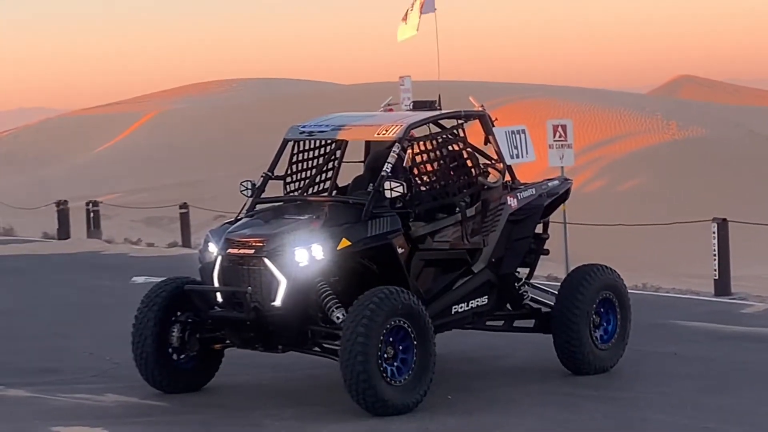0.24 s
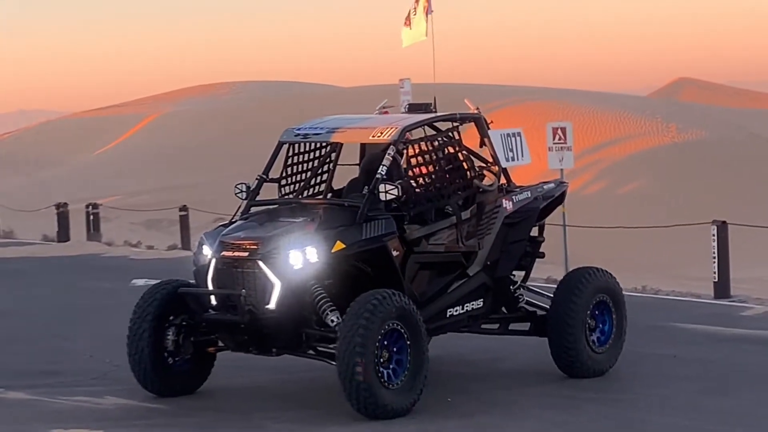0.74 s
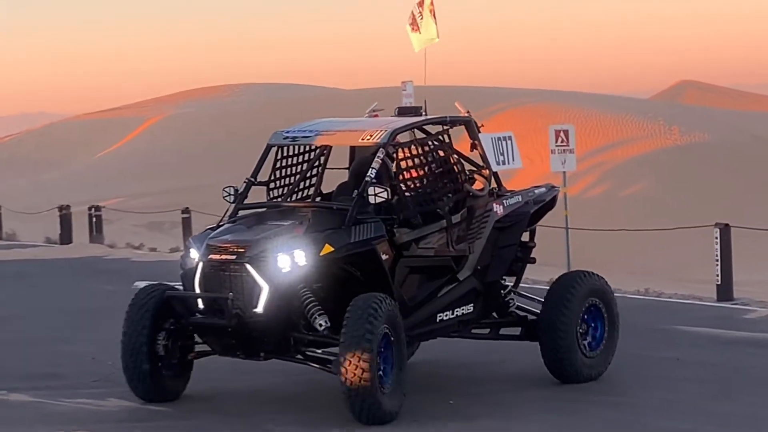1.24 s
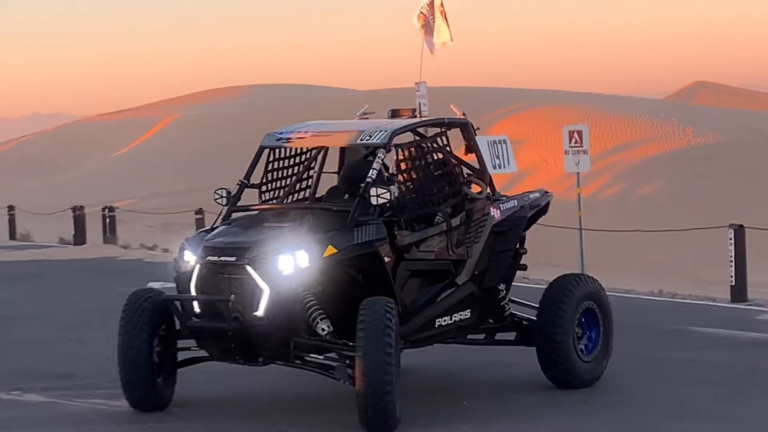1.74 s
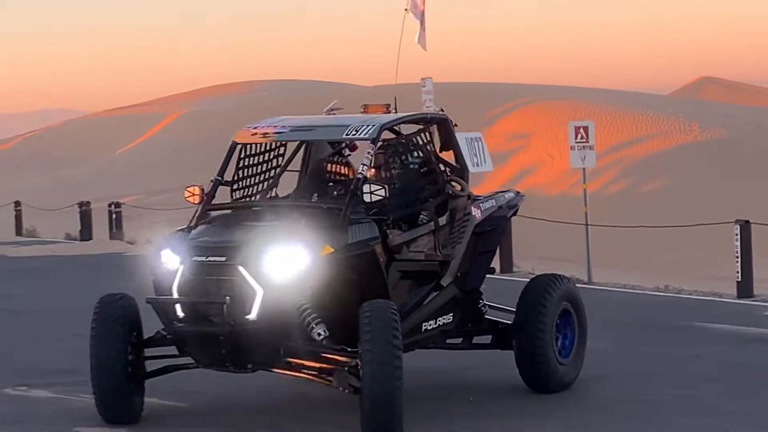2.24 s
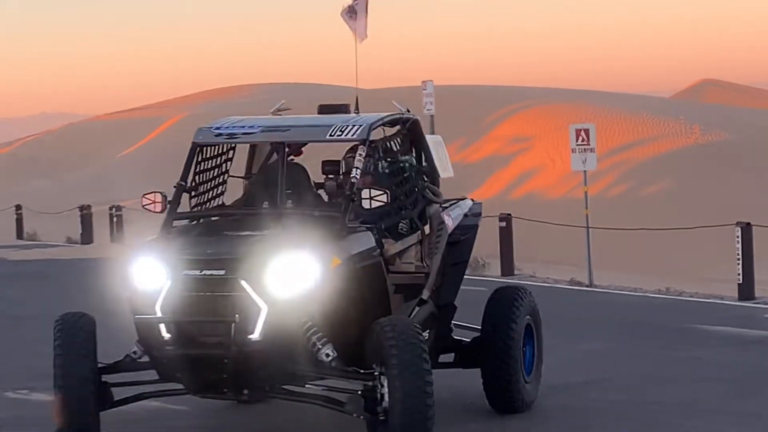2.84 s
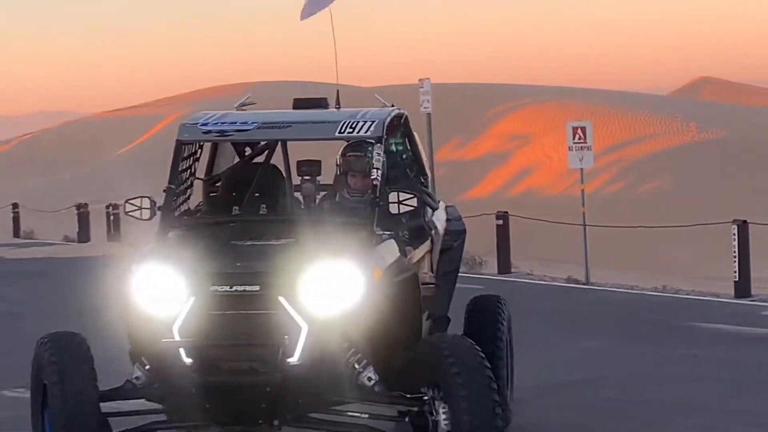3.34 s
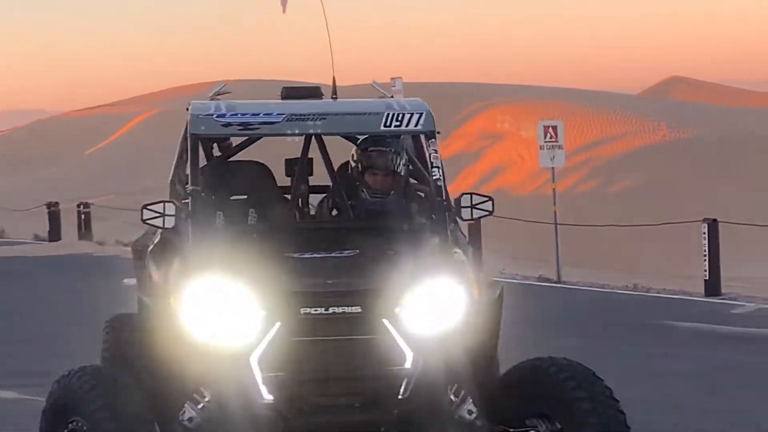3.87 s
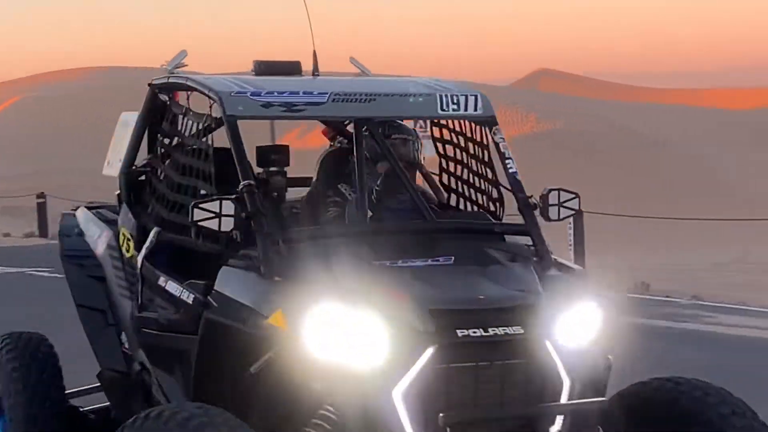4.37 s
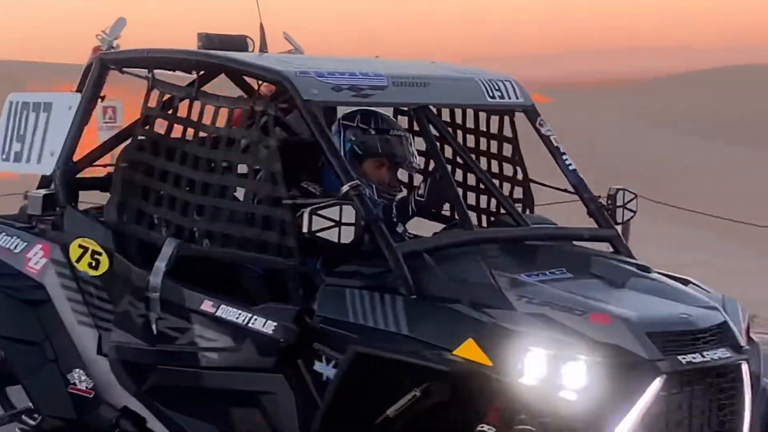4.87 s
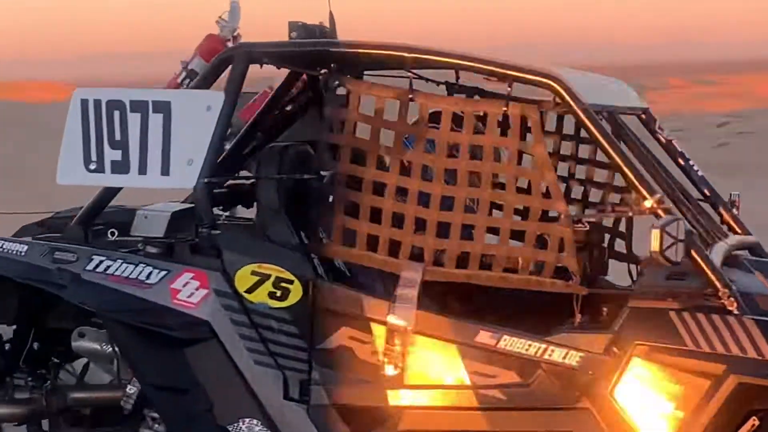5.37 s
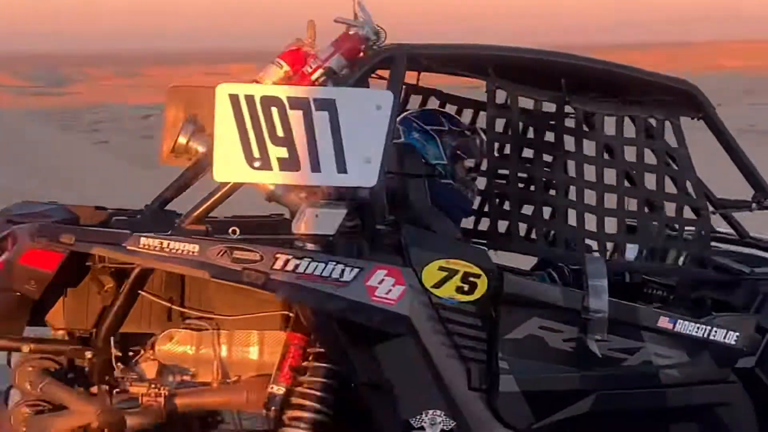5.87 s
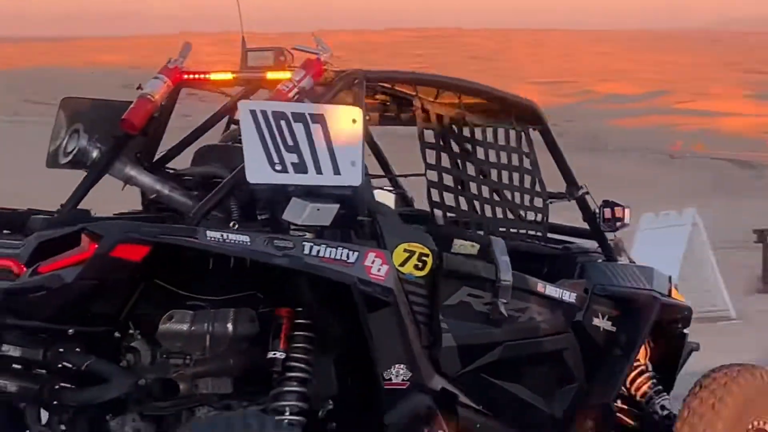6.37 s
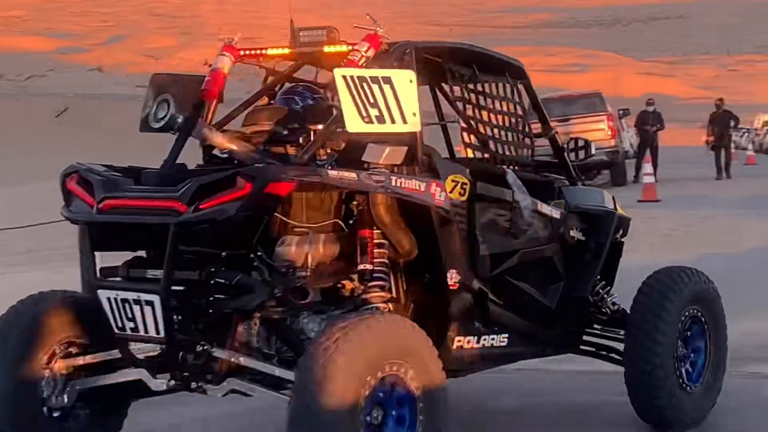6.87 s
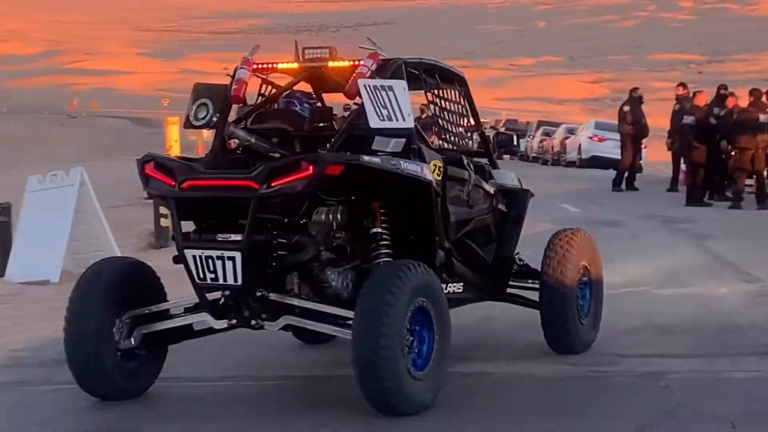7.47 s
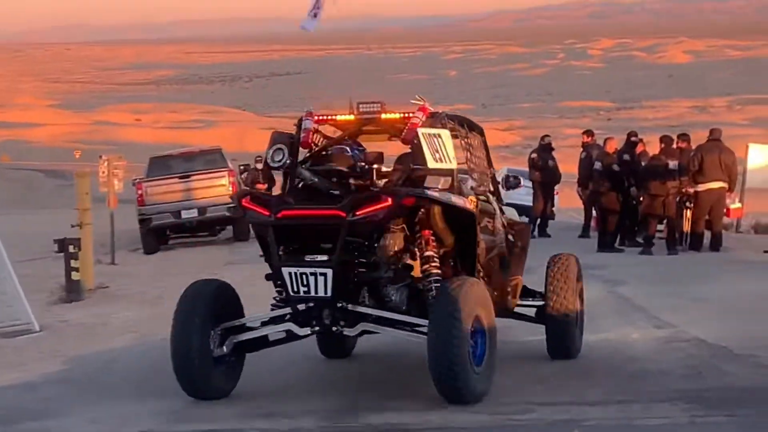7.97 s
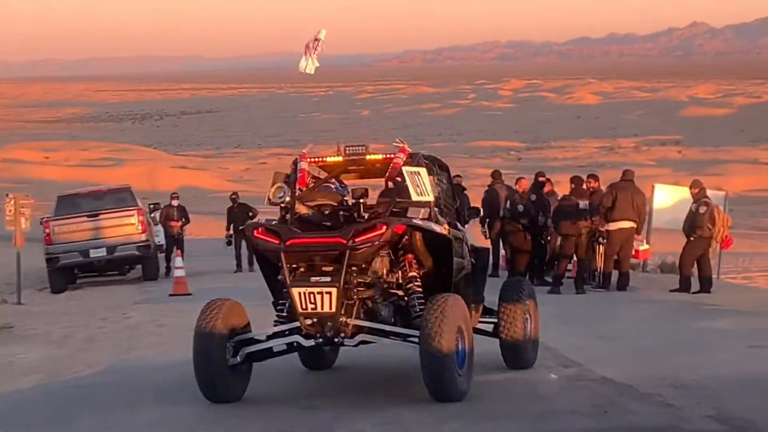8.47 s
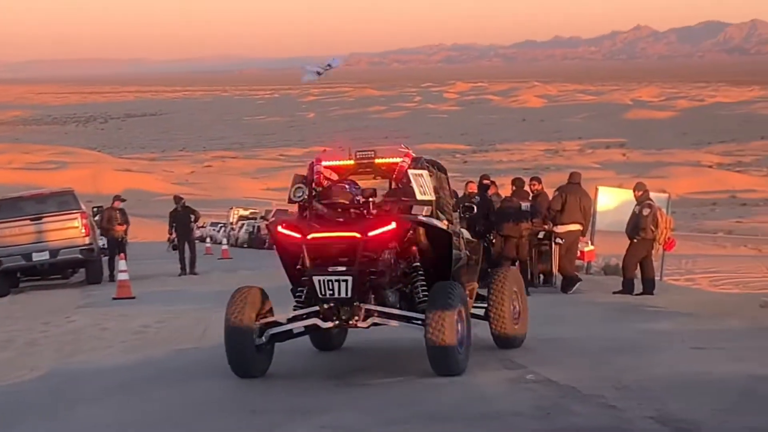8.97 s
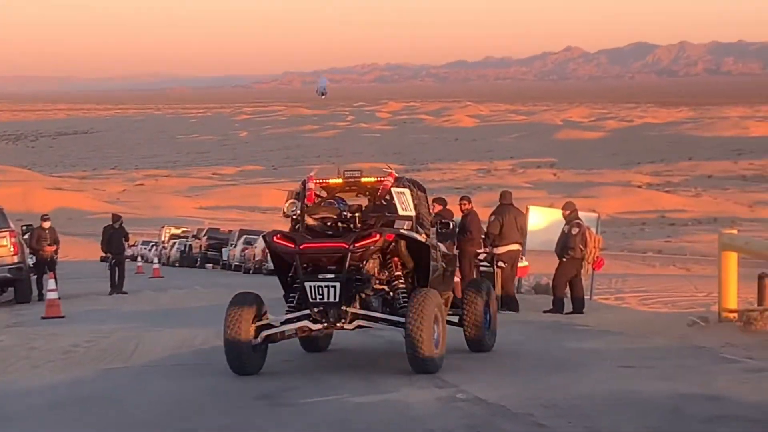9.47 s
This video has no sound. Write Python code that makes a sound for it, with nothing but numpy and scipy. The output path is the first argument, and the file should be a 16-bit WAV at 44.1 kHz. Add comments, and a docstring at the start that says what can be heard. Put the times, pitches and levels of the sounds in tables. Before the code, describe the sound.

A side-by-side buggy engine starts at a low, lumpy beat and quickly climbs in speed. Faint tyre scrapes and squeals mark the turn, over soft rolling rumble. Around the middle it goes by very close, loud, raspy and booming with gassy hiss. Then the pitch drops, the tailpipe spits irregularly, two low thuds pop, and the engine recedes, rough and quieter. Open desert pavement, near stereo microphone, little reverberation.

```python
"""Twin-cylinder engine of a side-by-side buggy: uneven firings boom in the exhaust, ring pipes and casing.
Each firing spits gas over a steady hiss and crackles at the tailpipe; all sources are synthesized.
The buggy pulls away on tarmac, turns, passes close by and rolls off; pitch, tone and level follow.
Filtered noise makes tyre rumble, scrubs and grit; closed throttle makes firing uneven; two pops thud late."""
import sys
import numpy as np
from scipy import signal
from scipy.fft import rfft, irfft, next_fast_len
from scipy.io import wavfile
from scipy.ndimage import uniform_filter1d

SR = 44100
rng = np.random.default_rng(int(sys.argv[2]) if len(sys.argv) > 2 else 0)


def persist_wave(psi):
    """Save psi, clipped to +-1, as 16-bit WAV."""
    counts = np.round(np.clip(psi, -1, 1) * 32767).astype(np.int16)
    wavfile.write(sys.argv[1], SR, np.atleast_2d(counts).T)


N = 428652
TIME_S = np.arange(N) / SR

# engine speed: t/s, four-stroke cycles/(1/s)
SPEED_PER_S = [(0.0, 12.72), (0.32, 18.51), (0.78, 19.47), (1.2, 22.67), (1.7, 25.8), (2.03, 27.67),
               (2.2, 26.93), (2.52, 25.08), (3.15, 24.84), (3.95, 25.62), (4.17, 28.38), (4.38, 27.87),
               (4.56, 30.28), (4.68, 29.88), (4.86, 31.38), (5.17, 31.1), (5.28, 33.18), (5.41, 33.94),
               (5.52, 32.24), (5.7, 33.47), (5.92, 32.27), (6.35, 31.13), (6.55, 31.24), (6.85, 30.88),
               (7.3, 28.05), (7.58, 27.57), (8.02, 23.63), (8.2, 24.35), (8.55, 24.46), (9.17, 23.16),
               (9.72, 19.88)]
# exhaust loudness: t/s, level/dB
EXHAUST_DB = [(0.0, -10.5), (1.62, -8), (3.71, -13), (4.87, -6.5), (5.71, -6), (6.06, -8.5), (6.33, -10),
              (6.66, -13), (7.01, -12.5), (7.6, -20), (7.9, -19), (8.07, -19), (8.18, -17), (9.72, -17.5)]
# the pass: t/s, side facing us (0 front quarter, 1 nose, 2 front wheel, 3 flank, 4 rear quarter, 5 tail),
# distance/m
PASS = [(0, 0, 8.8), (2.05, 0, 7.4), (2.6, .6, 6), (3.2, 1, 4.66), (3.6, 1.2, 4.4), (4.15, 2, 4),
        (4.6, 2.3, 3.15), (5.1, 3, 2.74), (6.0, 3, 2.8), (6.8, 4, 4), (7.4, 4.5, 5.3), (8.2, 5, 6.8),
        (9.72, 5, 9.7)]
# throttle closures: t/s, length/s, depth (0-1)
LIFTS = [(2.044, .4, 0.05), (6.97, 1.05, 0.59), (9.15, .6, 0.6)]

# silencer body tone from each side: f/Hz, relative level/dB
BODY_FRONT_QUARTER = [(80, -10), (120, 5.5), (165, 5), (205, 3.5), (250, 1.5), (305, -3), (365, -3.5),
                      (430, -13), (500, -16), (580, -16), (700, -29), (1100, -48)]
BODY_NOSE = [(80, -11.5), (120, 9.5), (165, -4.5), (205, 4), (250, -8.5), (305, -6.5), (365, -26.5),
             (430, -10.5), (500, -14), (580, -14), (700, -21), (1100, -51)]
BODY_FRONT_WHEEL = [(80, -30), (120, -0.5), (165, -2.5), (205, -1.5), (250, -7.5), (305, -1.5), (365, -3),
                    (430, -45), (500, -22), (580, -37), (700, -56), (1100, -51)]
BODY_FLANK = [(80, -37), (120, -1), (165, 18), (205, 2), (250, 1), (305, -22), (365, -5.5), (430, -10),
              (500, -3.5), (580, -30.5), (700, -17.5), (1100, -38)]
BODY_REAR_QUARTER = [(80, -8.5), (120, -5.5), (165, 15), (205, -6.5), (250, -3), (305, 0.5), (365, 2),
                     (430, -18.5), (500, -11.5), (580, -40), (700, -19), (1100, -53)]
BODY_TAIL = [(80, -6), (120, 8.5), (165, -11.5), (205, -1), (250, -4.5), (305, -15), (365, -7), (430, -11),
             (500, -12.5), (580, -20.5), (700, -34), (1100, -47)]
# silencer body from the six sides in turn: level/dB
BODY_DB = [-8, -11.5, 2, 16, 10, -6]
# small tailpipe radiates little deep bass: f/Hz, gain/dB
TAILPIPE_LOSS = [(28, -14), (58, 0)]
# weak or hard burns: t/s, change of strength/dB
MISFIRES = [(7.69, -14), (7.985, -11), (8.03, -17), (9.33, -5), (9.425, -7), (9.485, 8.5), (9.53, -4),
            (9.58, 2), (9.63, -5.5), (9.66, 4), (9.68, -1.5)]

# pipe resonances: f/Hz, width/Hz, relative level/dB
PIPES = [(694, 34, 14.5), (860.3, 37, 16), (964, 250, 4), (1081, 39, 15.5)]
# engine casing resonances: f/Hz, width/Hz, relative level/dB
CASING = [(1510, 240, 9.5), (1700, 140, 2), (2100, 260, -7), (2350, 123, 5.5)]
# strongest pipe resonance, shifting as the buggy goes by: t/s, f/Hz, level/dB
HOWL = [(3.7, 684, -48), (4.15, 716, -34), (4.5, 770, -33.5), (4.8, 855, -20), (5.0, 833, -31),
        (5.2, 834, -23), (5.55, 730, -33), (5.75, 710, -42), (5.98, 816, -38), (6.29, 833, -22.5),
        (6.6, 856, -23.5), (6.96, 804, -37.5), (7.6, 836, -34.5), (8.2, 820, -44), (9.3, 757, -55)]
# higher pipe resonance, heard while the flank is near: t/s, f/Hz, level/dB
UPPER_HOWL = [(3.0, 1120, -57), (3.9, 1150, -48), (4.3, 1134, -36), (4.8, 1170, -32), (5.2, 1150, -54),
              (5.41, 1138, -25), (5.6, 1180, -42), (6.2, 1200, -42), (6.5, 1030, -33), (6.95, 1030, -37),
              (7.6, 1010, -71)]
# casing rasp from the open engine bay: t/s, f/Hz, level/dB
RASP = [(4.5, 1690, -45), (4.92, 1720, -32), (5.2, 1650, -26), (5.4, 1620, -34), (5.5, 1570, -25),
        (5.65, 1700, -35.5), (6.2, 1680, -40), (6.56, 1770, -35.5), (7.0, 1920, -40.5), (7.5, 2104, -49)]

# gas and belt hiss ahead, beside, behind: f/Hz, relative level/dB
HISS_NOSE = [(1400, -27), (2600, -29.5), (3600, -6.5), (5300, -20.5), (7500, -18), (9800, -17),
             (12000, -28), (14000, -6), (15000, -25)]
HISS_FLANK = [(1400, -11.5), (2600, -7), (3300, -8), (5000, -16), (6200, -10), (8000, -12.5), (10000, -8.5),
              (12000, -29), (13800, 4), (15000, -44)]
HISS_TAIL = [(1400, -26), (2600, -6), (4000, -4.5), (5100, -15.5), (6400, -2), (7400, -0.5), (8700, -7),
             (10200, -2), (12000, -17.5), (13800, 9), (15000, -17)]
# firings that spit harder or softer: t/s, change of strength/dB
HARD_SPITS = [(6.749, 7), (6.781, 2), (7.03, 2.5), (7.064, 5), (7.132, -1), (7.235, 6), (7.272, -1),
              (7.379, 5), (7.744, 6.5), (7.862, 0), (7.902, 6), (7.943, -1.5), (9.195, 7.5), (9.281, 6),
              (9.465, 14), (9.512, 6), (9.607, 0), (9.657, 5.5)]
# the two rings of the tailpipe mouth: t/s, f/Hz, level/dB
CRACKLE_LOW = [(0, 3870, -49), (.25, 4270, -53.5), (.5, 4200, -83), (5.8, 3500, -75), (6.55, 3400, -40.5),
               (6.95, 3770, -40.5), (7.3, 4180, -60), (7.95, 4160, -42), (8.25, 3400, -74),
               (9.0, 3360, -44), (9.6, 3940, -47)]
CRACKLE_HIGH = [(5.8, 6440, -73), (6.9, 6940, -39), (7.3, 7600, -36.5), (7.95, 8300, -51),
                (8.25, 6600, -76), (8.6, 6260, -50), (8.9, 5750, -57), (9.202, 5770, -47.5),
                (9.6, 6100, -46)]

# tyre and air rumble: f/Hz, relative level/dB
RUMBLE = [(15, -46), (35, -22), (62, 0), (150, -5), (300, -12.5), (600, -20), (1400, -27), (3000, -34),
          (8000, -58)]
# rumble swells, in the turn and as the front wheel rolls by: t/s, 1/e half-length/s, level/dB
SWELLS = [(1.952, 0.45, -24), (4.35, 0.45, -21)]
# tyre scrubs: t/s, 1/e half-length/s, scrape level/dB, squeal level/dB
SCRUBS = [(1.407, 0.047, -39, -53), (1.778, 0.05, -35, -52), (2.046, 0.038, -38, -60),
          (2.338, 0.021, -35, -40), (2.482, 0.019, -47, -28), (2.68, 0.038, -35, -26.5),
          (3.77, 0.062, -36.5, -29)]
# rubber scraping on tarmac: f/Hz, relative level/dB
SCRAPE = [(500, -32), (1000, 11), (1700, 10.5), (2400, 7.5), (4000, -11), (9000, -16)]
# grit snapping under a tyre: t/s, onset level/dB
GRIT = [(2.961, -37.5), (3.448, -43), (4.807, -31)]
# afterfire in the silencer: t/s, impulse level/dB (the highest sets the peak)
POPS = [(8.005, -10.5), (8.048, -10)]

# laws of loudness: level/dB at 1 m and cruising speed, rise/dB per doubling of speed,
# flank/dB, behind/dB, closed throttle/dB
BARK_LAW = (-24.5, 23, -2.5, 1.5, 0)
CLATTER_LAW = (-32.5, 7, 4, 8, 2)
HISS_LAW = (-33, 6.5, 3.5, 6.5, 2.5)
SIZZLE_LAW = (-32, 12, -0.5, 3.5, 8)
RUMBLE_LAW = (-12, -3.5, -5, -2, 0)

CRUISE_PER_S = 25
START_TURN, SECOND_FIRING = .333, .37  # in cycles
UNEVEN_DB, STUMBLE_DB = 0.6, 2.2  # spread of firing strength: open throttle, added when closed
CLOSE_S, REOPEN_S = 0.35, 0.072
# the boom rises with engine speed as the gas heats, and rings longer at high revs
BOOM_HZ_PER_CYCLE_PER_S, BOOM_LOWEST_HZ = 4.28, 109
BOOM_WIDTH_HZ, BOOM_NARROWING = 7.5, 1.8  # at cruising speed; halvings per doubling of speed
THUMP_DB, THUMP_RISE_DB = -23, 64.5  # at cruising speed; per doubling of speed
# burns go soft: onset, transition, change of body level, fractional drop of boom pitch
SOFT_S, SOFT_SPAN_S, SOFT_DB, SOFT_SINK = 9.12, .3, -9, .08
# spit share of gas flow power: at the front, added behind, added closed, lost per doubling of speed
SPIT_SHARE, SPIT_BEHIND, SPIT_CLOSED, SPIT_BLUR = 0.34, 0.2, 0.36, 0.024
TAILPIPE_HEIGHT_M, MICROPHONE_HEIGHT_M, SOUND_M_PER_S = 0.831, 0.922, 343
LEAD_SAMPLES, LEAD_AT_S, LEAD_SPAN_S = 4.66, 5.61, 2.6  # left microphone ahead of right
CUTOFF_HZ = 15500


def from_db(db):
    """Amplitude ratio from decibels."""
    return 10 ** (np.asarray(db) / 20)


def at_time(rows, t=TIME_S):
    """Columns of a curve, interpolated at the given times."""
    s, *columns = np.transpose(rows)
    return [np.interp(t, s, column) for column in columns]


def at_hz(points, hz):
    """Spectrum gain, interpolated in dB over log frequency."""
    f, db = np.transpose(points)
    return from_db(np.interp(np.log(hz + 1), np.log(f), db))


def unit(x):
    """Scale to rms 1 along the last axis."""
    return x / np.sqrt(np.mean(x ** 2, axis=-1, keepdims=True) + 1e-20)


def even(x, size=5000):
    """Level the running rms to 1, slowly enough to leave single firings standing."""
    power = np.mean(np.atleast_2d(x) ** 2, axis=0)
    running_power = uniform_filter1d(uniform_filter1d(power, size), size)
    return x / np.sqrt(running_power + 1e-14)


def band(x, low_hz, high_hz, order=2):
    """Butterworth band-pass."""
    edges_hz = [low_hz, min(high_hz, .45 * SR)]
    return signal.sosfilt(signal.butter(order, edges_hz, "band", fs=SR, output="sos"), x)


def noise(apart):
    """Stereo white noise; apart is the size of the unshared part."""
    mid, side = rng.standard_normal((2, N))
    return unit(mid + apart * side * [[1], [-1]])


def colour(x, spectrum):
    """Shape by a spectrum, then scale to rms 1."""
    size = next_fast_len(N)
    gain = at_hz(spectrum, np.fft.rfftfreq(size, 1 / SR))
    return unit(irfft(rfft(x, size) * gain, size)[..., :N])


def two_poles(hz, width_hz):
    """Pole radius and denominator of a damped resonance."""
    r = np.exp(-np.pi * width_hz / SR)
    return r, [1, -2 * r * np.cos(2 * np.pi * hz / SR), r * r]


def resonate(x, modes):
    """Parallel resonances of alternating sign."""
    out = 0
    for k, (hz, width_hz, db) in enumerate(modes):
        r, poles = two_poles(hz, width_hz)
        gain = (-1) ** k * from_db(db) * (1 - r * r) / 2
        out = out + gain * signal.lfilter([1, 0, -1], poles, x + 1e-18)
    return out


def disperse(x, hz, width_hz):
    """All-pass: silencer chambers delay waves near their own pitch and spread each pulse."""
    _, poles = two_poles(hz, width_hz)
    return signal.lfilter(poles[::-1], poles, x)


def sweep(x, curve, width_hz):
    """Resonance following a curve: shift to zero frequency, low-pass, shift back, set level."""
    hz, db = at_time(curve)
    carrier = np.exp(2j * np.pi * np.cumsum(hz) / SR)
    low_pass = signal.butter(2, width_hz / 2, fs=SR, output="sos")
    slow = signal.sosfilt(low_pass, x / carrier + 1e-18)
    return from_db(db) * even((slow * carrier).real)


def clicks(times, sizes):
    """Single-sample impulses at the given times."""
    out = np.zeros(N)
    out[np.clip((times * SR).astype(int), 0, N - 1)] = sizes
    return out


def fade(x, seconds):
    """Exponential decay after each click."""
    return signal.lfilter([1], [1, -np.exp(-1 / (seconds * SR))], x + 1e-18)


def facing(t, count):
    """Crossfade shares of neighbouring sides."""
    view = np.clip(at_time(PASS, t)[0], 0, count - 1)
    return [np.maximum(0, 1 - abs(view - k)) for k in range(count)]


def aspects():
    """Shares of front, flank and rear."""
    sides = facing(TIME_S, count=6)
    return sum(sides[:3]), sides[3], sum(sides[4:])


def revs(t=TIME_S):
    """Engine speed in doublings above cruising speed."""
    return np.log2(at_time(SPEED_PER_S, t)[0] / CRUISE_PER_S)


def closed(t=TIME_S):
    """Throttle closure: eases shut, holds, reopens quickly."""
    total = 0
    for s, length_s, depth in LIFTS:
        closing = (t - s) / CLOSE_S
        reopening = 1 + (s + length_s - t) / REOPEN_S
        total = total + depth * np.clip(np.minimum(closing, reopening), 0, 1)
    return total


def loudness(law):
    """Gain from engine speed, throttle and facing side; falls as 1/distance."""
    db, rise_db, flank_db, behind_db, closed_db = law
    _, flank, behind = aspects()
    db = db + rise_db * revs() + flank_db * flank + behind_db * behind + closed_db * closed()
    return from_db(db) / at_time(PASS)[1]


def ground(x, bounce):
    """Tarmac returns a late copy; its comb notches move with distance."""
    n = np.arange(N)
    detour_m = 2 * TAILPIPE_HEIGHT_M * MICROPHONE_HEIGHT_M / at_time(PASS)[1]
    late = n - detour_m / SOUND_M_PER_S * SR
    return np.array([c + bounce * np.interp(late, n, c) for c in np.atleast_2d(x)])


def accents(times, rows):
    """Gain per firing: the firing nearest each listed time stands out or falls short."""
    index = np.arange(len(times))
    return from_db(sum(db * (index == abs(times - s).argmin()) for s, db in rows))


def firings():
    """Times and cylinders of firings: the second follows about three eighths of a cycle after the first."""
    turns = START_TURN + np.cumsum(at_time(SPEED_PER_S)[0]) / SR
    due = (np.arange(int(turns[-1]) + 1)[:, None] + [0, SECOND_FIRING]).ravel()
    due = due[(due > turns[0]) & (due < turns[-1])]
    return np.interp(due, turns, TIME_S), due % 1 > 0


def exhaust(times, strength, thump_hz=58, skirt_hz=290, size=8192):
    """Each firing's pressure pulse rings the silencer: speed-following boom, body tone and sub-bass thump."""
    hz = np.fft.rfftfreq(size, 1 / SR) + 1
    t = times[:, None]
    soft = np.clip((t - SOFT_S) / SOFT_SPAN_S, 0, 1)

    centre_hz = np.maximum(BOOM_LOWEST_HZ, BOOM_HZ_PER_CYCLE_PER_S * at_time(SPEED_PER_S, t)[0])
    centre_hz = centre_hz * (1 - SOFT_SINK * soft)
    width_hz = BOOM_WIDTH_HZ / 2 ** (BOOM_NARROWING * revs(t))
    resonance = 1 / np.hypot(1, (hz - centre_hz ** 2 / hz) / width_hz)
    boom = unit(resonance / (1 + (hz / skirt_hz) ** 4))
    thump = unit(1 / (1 + (2 * np.log2(hz / thump_hz)) ** 4))

    sides = [BODY_FRONT_QUARTER, BODY_NOSE, BODY_FRONT_WHEEL, BODY_FLANK, BODY_REAR_QUARTER, BODY_TAIL]
    shares = facing(t, count=6)
    body = unit(sum(share * at_hz(tone, hz) for share, tone in zip(shares, sides)))
    body_db = sum(share * db for share, db in zip(shares, BODY_DB))
    # no two burns are equally sharp
    body_db = body_db + 1.1 * rng.standard_normal(t.shape) + SOFT_DB * soft

    boom_db = at_time(EXHAUST_DB, t)[0]
    thump_db = THUMP_DB + THUMP_RISE_DB * revs(t)
    power = boom ** 2
    power = power + (from_db(thump_db - boom_db) * thump) ** 2
    power = power + (from_db(body_db - boom_db) * body) ** 2

    # a passive pipe answers as early as it can: minimum phase
    cepstrum = irfft(np.log(power) / 2)[:, :size // 2]
    cepstrum[:, 1:] *= 2
    pulses = irfft(np.exp(rfft(cepstrum, size)))
    out = np.zeros(N + size)
    for start, pulse in zip((times * SR).astype(int), pulses * strength[:, None]):
        out[start:start + size] -= pulse

    spread = disperse(band(out[:N], 32.7, 944), hz=90, width_hz=110)
    tailpipe = colour(spread, TAILPIPE_LOSS)
    return from_db(at_time(EXHAUST_DB)[0]) * even(ground(tailpipe, bounce=0.2))


def spits(times, sizes, decay_s, rise_s=0.00011):
    """Gas flow envelope: a steady part and a burst at each firing, added as power."""
    _, _, behind = aspects()
    share = SPIT_SHARE + SPIT_BEHIND * behind + SPIT_CLOSED * closed() - SPIT_BLUR * revs()
    share = np.clip(share, 0, .98)
    bursts = even(fade(fade(clicks(times, sizes), decay_s), rise_s))
    return np.sqrt(1 - share + share * bursts ** 2)


def bark(times, strength, second, casing_rough=7.1, rasp_rough=1.0, echo=0.92, echo_s=0.005134):
    """Steep pulse fronts and their turbulence ring the pipes and the casing."""
    sizes = strength * from_db(rng.normal(0, 1.0, len(times)) - 0.5 * second)
    # timing jitter smears the upper harmonics
    times = times + .00008 * rng.standard_normal(len(times))
    fronts = even(clicks(times, sizes) + clicks(times + echo_s, echo * sizes))
    flow = spits(times, sizes, decay_s=0.0016)
    turbulence = .33 * flow * noise(apart=.6)

    pipes = band(resonate(fronts + turbulence, PIPES), 477, 2500)
    pipes = even(ground(pipes, bounce=0.34))
    casing_drive = fronts + casing_rough * flow * noise(apart=0.72)
    casing = band(resonate(casing_drive, CASING), 1510, 3800)
    casing = even(ground(casing, bounce=0.46))

    howl = sweep(fronts + turbulence / 2, HOWL, width_hz=88)
    howl = howl + sweep(fronts + turbulence, UPPER_HOWL, width_hz=140)
    rasp = sweep(fronts + rasp_rough * flow * noise(apart=0.74), RASP, width_hz=196)
    pipe_sound = (loudness(BARK_LAW) * pipes + howl) * from_db([[.5], [-.5]])
    return pipe_sound + loudness(CLATTER_LAW) * casing + rasp


def hiss(times, strength, second, spread_db=5.0):
    """Tailpipe gas spits over the steady rush of belt and intake; weak burns spit harder."""
    sizes = from_db(rng.normal(0, spread_db, len(times)) - 3.1 * second)
    sizes = sizes * accents(times, HARD_SPITS) / np.sqrt(strength)
    white = noise(apart=.4)
    white = white * spits(times, sizes, decay_s=0.0059, rise_s=0.00016)
    shares = aspects()
    tones = [HISS_NOSE, HISS_FLANK, HISS_TAIL]
    air = sum(share * colour(white, tone) for share, tone in zip(shares, tones))
    # only from behind is the tailpipe in plain view, with a clear ground reflection
    air = ground(air, bounce=.28 * shares[2])
    low = even(band(air, 2760, 5130, order=3))
    sizzle = even(band(air, 5380, 11800, order=3))
    return loudness(HISS_LAW) * low + loudness(SIZZLE_LAW) * sizzle


def crackle(times, spread_db=3.5, decay_s=0.0035):
    """The crack of each spit, a decaying noise burst, rings the tailpipe mouth."""
    sizes = accents(times, HARD_SPITS) * from_db(rng.normal(0, spread_db, len(times)))
    cracks = fade(clicks(times, sizes), decay_s) * noise(apart=0.47)
    return sweep(cracks, CRACKLE_LOW, width_hz=240) + sweep(cracks, CRACKLE_HIGH, width_hz=810)


def slips(per_s=260, decay_s=0.0033):
    """Envelope of tread blocks that grip and let go at random."""
    releases = (rng.random(N) < per_s / SR) * rng.uniform(.4, 1, N)
    return unit(fade(releases, decay_s) + .1)


def tyres(squeal_hz=720, squeal_width_hz=45):
    """Knobbly tyres rumble as coloured noise, scrub with scrape and squeal, and snap grit."""
    swells = sum(from_db(db) * np.exp(-((TIME_S - s) / length_s) ** 2) for s, length_s, db in SWELLS)
    out = np.hypot(loudness(RUMBLE_LAW), swells) * colour(noise(apart=.25), RUMBLE)

    scrape = colour(noise(apart=0.26), SCRAPE) * slips()
    squeal = unit(resonate(noise(apart=0.28), [(squeal_hz, squeal_width_hz, 0)]))
    for s, length_s, scrape_db, squeal_db in SCRUBS:
        near = abs(TIME_S - s) < 3 * length_s
        envelope = np.exp(-((TIME_S[near] - s) / length_s) ** 2)
        scrub = from_db(scrape_db) * scrape[:, near] + from_db(squeal_db) * squeal[:, near]
        out[:, near] += envelope * scrub

    s, db = np.transpose(GRIT)
    snaps = fade(clicks(s, from_db(db)), seconds=0.039)
    return out + snaps * unit(band(noise(apart=0.51), 2800, 10500))


def afterfire(pop_hz=98, width_hz=22):
    """Unburnt fuel goes off in the silencer: impulses ring a low resonance."""
    s, db = np.transpose(POPS)
    thuds = resonate(clicks(s, -from_db(db)), [(pop_hz, width_hz, 0)])
    return from_db(db.max()) * band(thuds, 30, 410) / abs(thuds).max()


def scene():
    """Engine and tyres at two closely spaced microphones."""
    times, second = firings()
    spread_db = UNEVEN_DB + STUMBLE_DB * closed(times)
    strength = from_db(spread_db * rng.standard_normal(len(times)) + 1.32 * second)
    # uneven burns also come early or late
    times = times + .0001 * spread_db * rng.standard_normal(len(times))

    low = exhaust(times, strength * accents(times, MISFIRES)) + afterfire()
    low = low * from_db([[-1.5], [1.2]])
    high = bark(times, strength, second) + hiss(times, strength, second) + crackle(times)
    left, right = low + high + tyres()

    # sound reaches the left microphone first, most so near the closest approach
    lead = LEAD_SAMPLES * np.exp(-((TIME_S - LEAD_AT_S) / LEAD_SPAN_S) ** 2)
    fine = signal.resample_poly(right, 4, 1)  # for fractional delay
    right = np.interp(np.arange(N) - lead, np.arange(4 * N) / 4, fine)
    return np.array([left, right])


def record(dry, top=0.81):
    """Round the highest peaks, then cut the top treble."""
    rounded = dry / (1 + (dry / top) ** 6) ** (1 / 6)
    return signal.sosfilt(signal.ellip(10, .1, 90, CUTOFF_HZ, fs=SR, output="sos"), rounded)


dry = scene()
out = record(dry)
persist_wave(out)
```